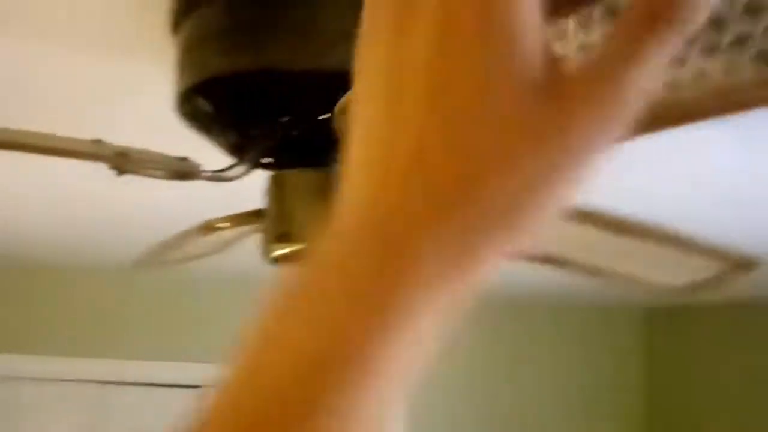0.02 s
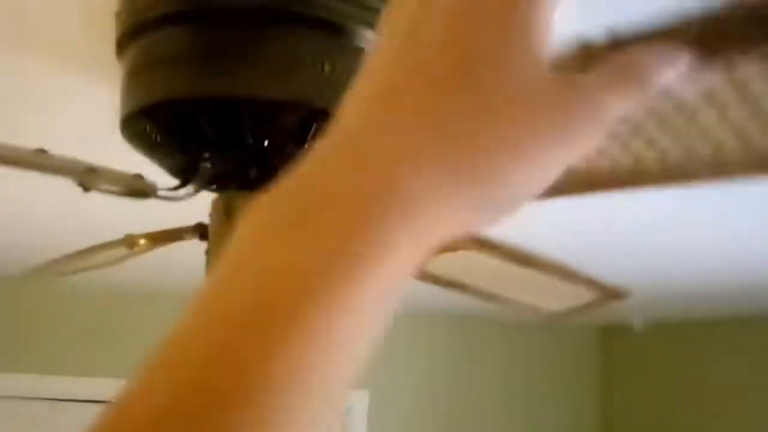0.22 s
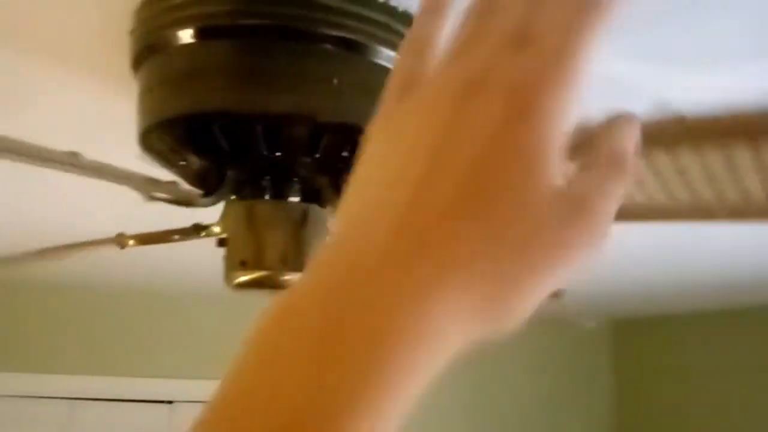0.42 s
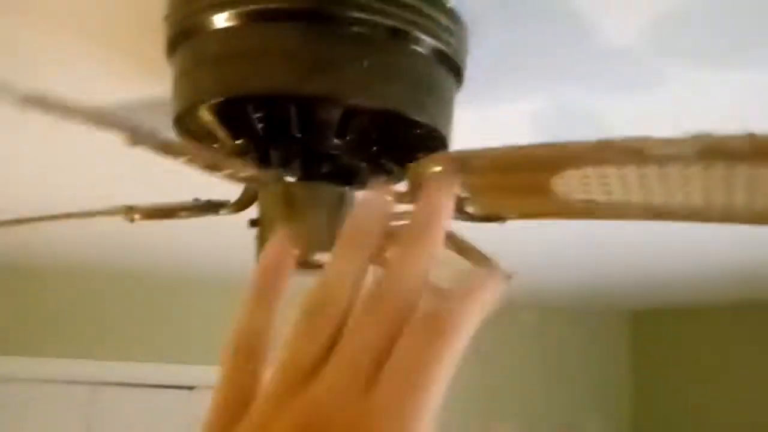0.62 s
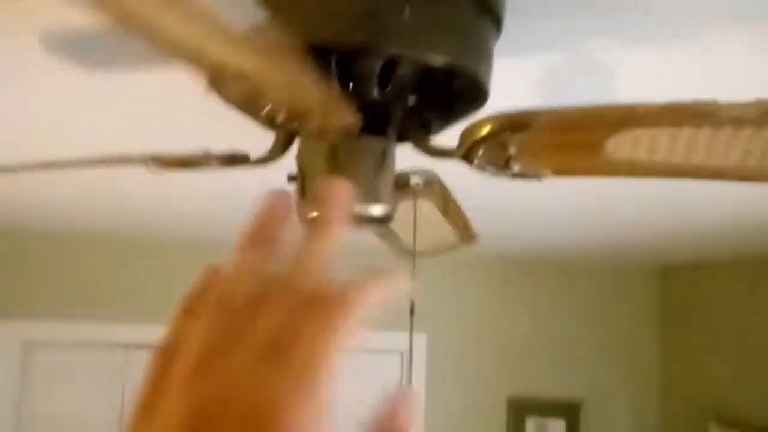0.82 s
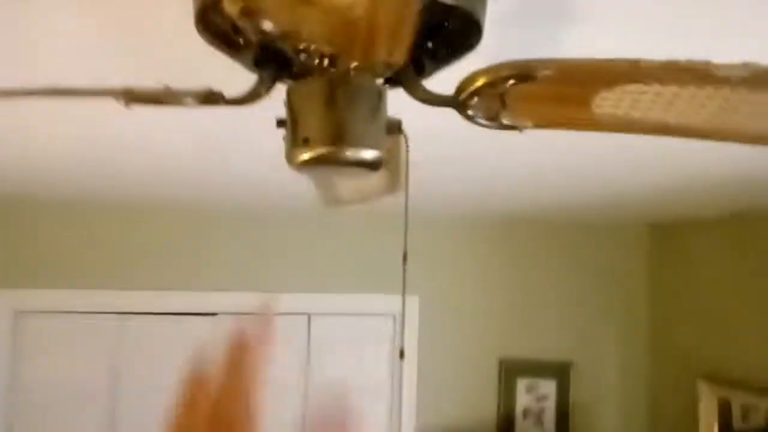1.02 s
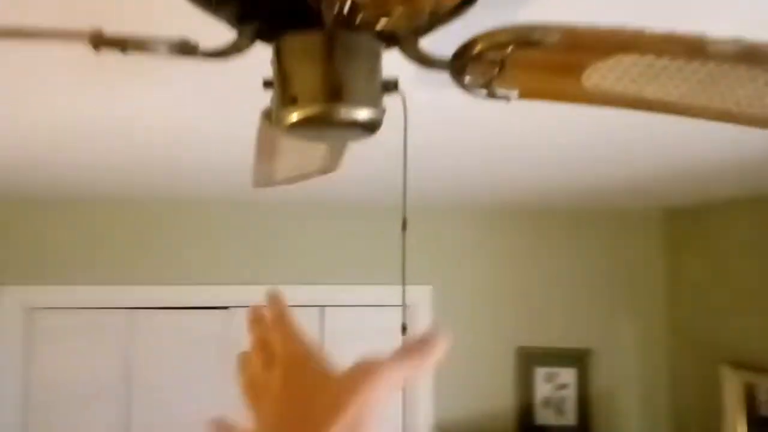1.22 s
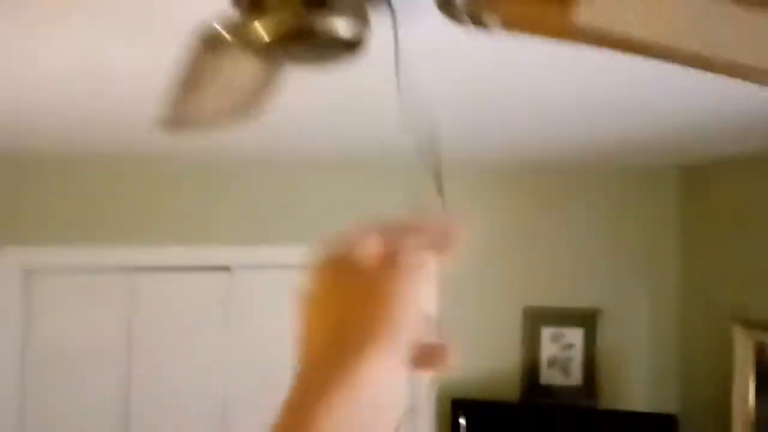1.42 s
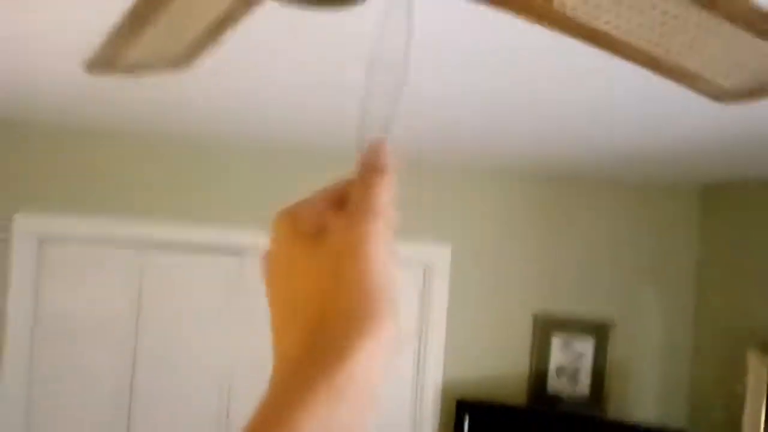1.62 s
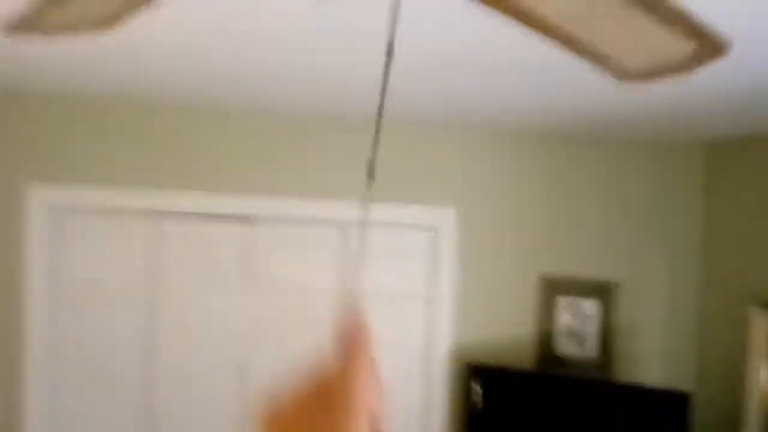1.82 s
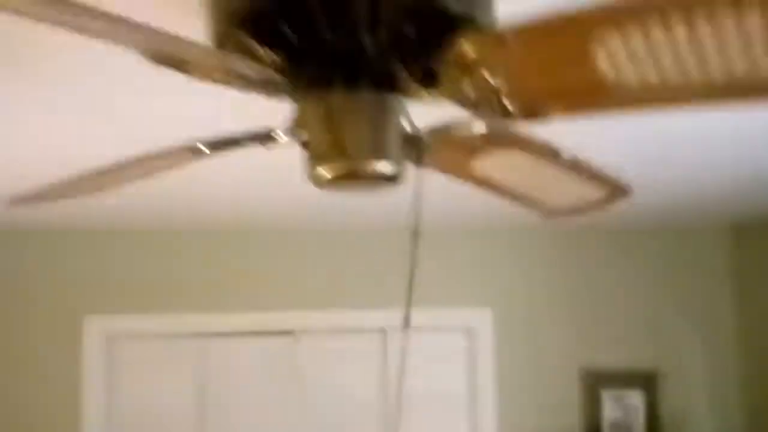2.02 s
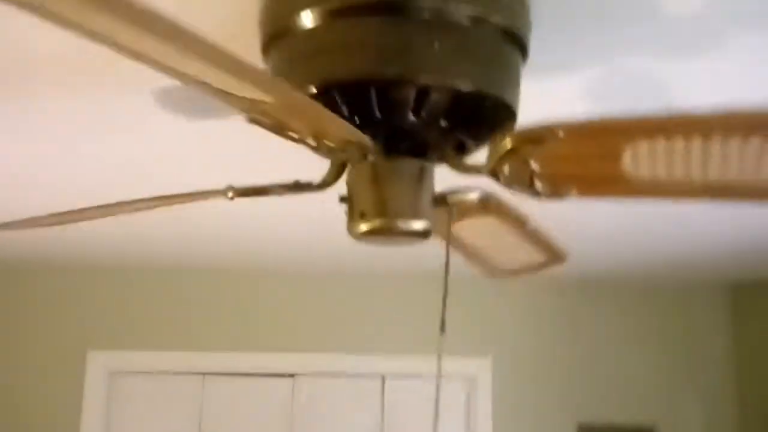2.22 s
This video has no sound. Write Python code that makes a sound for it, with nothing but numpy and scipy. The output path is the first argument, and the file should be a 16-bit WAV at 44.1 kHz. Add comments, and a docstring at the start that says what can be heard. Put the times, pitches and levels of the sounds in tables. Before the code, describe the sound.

Fan blades hitting a hand: a weak knock, a firm slap, then a sharper, woody smack with low shudder. After a near-silent gap, soft rustling and tiny metallic chain clicks, close up in a small room with light hiss.

```python
"""Three slaps of a slowly turning ceiling fan's wooden, cane-inlaid blades against a hand in a quiet bedroom.
Each slap is damped thud and snap pulses plus cane rattle, random clicks shaped by a spectrum.
Thuds ring the blade modes, the fan shudders on its mount, and decaying noise gives a brief room tail.
Then the arm rustles and the pull chain, caught and let go, ticks into small metal modes.
Low house rumble and microphone hiss are filtered noise."""
import sys
import numpy as np
from scipy import signal
from scipy.fft import rfft, irfft
from scipy.io import wavfile
from scipy.ndimage import uniform_filter1d

SR = 44100
rng = np.random.default_rng(int(sys.argv[2]) if len(sys.argv) > 2 else 0)


def transcribe(u):
    """Save the signal u as a 16-bit wav file named by the first command-line argument.

    u: samples, shape (n,) or (channels, n), limited to [-1, 1]; the rate is SR.
    q: integer samples, one column per channel.
    """
    v = np.clip(np.atleast_2d(u).T, -1, 1)
    q = np.round(v * 32767).astype(np.int16)
    wavfile.write(sys.argv[1], SR, q)


N = 101430

# Flesh meets blade. Each row: start in seconds, level in dB, pitch in Hz, blade ring in dB, swell in cycles.
THUDS = [(0.0263, -30, 602, -19.5, 1.1), (0.0328, -41, 387, -13, 1.84), (0.2429, -24.5, 452, -21, 0.85),
         (.2505, -27.5, 740, -13.5, 0.84), (.4160, -47, 513, 2, 0.56), (0.4183, -20, 491, -8, 0.83),
         (0.4284, -18, 786, -8, 0.63), (0.4309, -26, 1380, -19, 1.8), (.4350, -32.5, 256, -4.5, 0.7)]


def amp(db):
    """Converts dB to linear gain."""
    return 10 ** (np.asarray(db) / 20)


def rms_one(x):
    """Scales a signal to rms 1."""
    return x / np.sqrt(np.mean(x ** 2) + 1e-20)


def lowpass(x, top_hz):
    """Sixth-order treble loss above top_hz."""
    return signal.sosfilt(signal.butter(6, top_hz, fs=SR, output="sos"), x)


def at_hz(points, hz):
    """Reads a (Hz, value) curve on a log-frequency axis."""
    points_hz, values = np.array(points).T
    return np.interp(np.log(np.maximum(hz, 1)), np.log(points_hz), values)


def level(rows):
    """Gain along a (seconds, dB) curve."""
    return amp(np.interp(np.arange(N) / SR, *np.transpose(rows)))


def colour(x, spectrum):
    """Shapes a noise by a (Hz, dB) spectrum; rms 1."""
    gain = amp(at_hz(spectrum, np.fft.rfftfreq(N, 1 / SR)))
    return rms_one(irfft(rfft(x) * gain, N))


def ring(x, hz, t60_s):
    """Two-pole resonator: a unit click starts a decaying sine of height 1."""
    radius = amp(-60 / (t60_s * SR))
    angle = 2 * np.pi * hz / SR
    return signal.lfilter([0, np.sin(angle)], [1, -2 * radius * np.cos(angle), radius ** 2], x + 1e-18)


def swells(rows):
    """Sum of envelopes (start s, dB, rise s, t60 s): linear rise, exponential decay."""
    t = np.arange(N) / SR
    total = 0
    for start_s, db, rise_s, t60_s in rows:
        decay = amp(db - 60 * np.maximum(t - start_s - rise_s, 0) / t60_s)
        total = total + decay * np.clip((t - start_s) / rise_s, 0, 1)
    return total


def grains(per_s, spread_db):
    """Random clicks of uneven size and random sign; rms 1."""
    sizes = amp(spread_db * np.minimum(rng.exponential(1, N), 4)) * rng.choice([-1, 1], N)
    return rms_one(sizes * (rng.random(N) < per_s / SR))


def favour(hz, favoured_hz):
    """Change in dB of a mode, falling with its distance from the favoured pitch."""
    db_per_octave = 31.5
    return -db_per_octave * abs(np.log2(hz / favoured_hz))


def add_pulse(out, start_s, db, hz, cycles, grit_db=-90):
    """Adds a heavily damped contact: a gritty sine that peaks after some cycles and dies."""
    turn = np.arange(int(.03 * SR)) * hz / SR
    shape = (turn / cycles) ** 2 * np.exp(2 - 2 * turn / cycles)
    wave = -np.sin(2 * np.pi * turn) + amp(grit_db) * rng.standard_normal(len(turn))
    i = int(start_s * SR)
    out[i:i + len(turn)] += amp(db) * shape * wave


def slaps():
    """Damped thuds and snaps, their top dulled by soft skin, with clicks of the cane rattling."""
    # Fingers and fittings. Each row: start in seconds, level in dB, pitch in Hz.
    snaps = [(.0488, -47, 4300), (.0797, -42, 4000), (.0812, -47, 3800), (.0995, -55, 3500),
             (.2500, -33, 3300), (.2522, -32, 4600), (.2542, -31, 3800), (.2578, -34, 4800),
             (.2627, -23, 4400), (.2725, -35, 4800), (.4209, -25, 2800), (.4230, -22, 4600),
             (.4240, -17, 5100), (.4249, -22, 4600), (.4329, -15, 3400), (.4340, -21, 4300),
             (.4386, -17, 4500), (.5460, -45, 4500)]
    # Cane rattling or brushing the fingers. Each row: start in seconds, level in dB, rise in s, t60 in s.
    rattles = [(.034, -56.5, 0.017, .2), (.195, -62, 0.028, 0.18), (.247, -34.5, 0.0064, .1),
               (.405, -60, 0.015, .05), (.420, -31.5, 0.012, .1)]
    # Rattle spectrum. Each row: frequency in Hz, density in dB per Hz.
    rattle_spectrum = [(530, -10), (900, -7.5), (1180, -20), (1340, -1.5), (1780, -8), (2910, -1),
                       (3230, -3), (4760, 1), (6940, -23), (11000, -39.5), (14300, -67.5), (22000, -120)]
    snap_swell_cycles, snap_grit_db = 1.47, -12.5
    contact_top_hz = 7520
    rattle_per_s, rattle_spread_db = 9000, -1

    contacts = np.zeros(N)
    for start_s, db, hz, _, cycles in THUDS:
        add_pulse(contacts, start_s, db, hz, cycles)
    for start_s, db, hz in snaps:
        add_pulse(contacts, start_s, db, hz, snap_swell_cycles, snap_grit_db)
    contacts = lowpass(contacts + 1e-18, contact_top_hz)
    cane = colour(grains(rattle_per_s, rattle_spread_db), rattle_spectrum)
    return contacts + swells(rattles) * cane


def blade_boom():
    """Every thud rings the blade modes, most strongly those near its pitch."""
    # Blade modes. Each row: frequency in Hz, level in dB, t60 in s.
    blade_modes = [(236, -6.5, 0.32), (296.3, -13, 0.31), (350, -40, 0.087), (413, -9, .24),
                   (449, -13, .24), (541, -11, .18), (661, -13, 0.13), (734, -39, 0.31), (880, -13, 0.077),
                   (1043, -10, 0.35), (1274, -18, 0.19), (1470, -21, 0.12)]
    favour_share = .4

    out = np.zeros(N)
    for hz, mode_db, t60_s in blade_modes:
        clicks = np.zeros(N)
        for start_s, db, thud_hz, ring_db, _ in THUDS:
            click_db = db + ring_db + mode_db + favour_share * favour(hz, thud_hz)
            clicks[int(start_s * SR)] = amp(click_db)
        out += ring(uniform_filter1d(clicks, size=15), hz, t60_s)
    return out


def mount_shudder():
    """The whole fan shudders on its mount: low modes build up, then decay."""
    # Each row: start in seconds, level in dB, rise in s, favoured pitch in Hz, share of the free ring time.
    shudders = [(0.053, -52, 0.018, 140, 0.64), (0.073, -50.5, 0.023, 70, 0.67),
                (.255, -29.5, 0.016, 125.7, 0.37), (0.261, -48.5, .03, 66, .6),
                (0.332, -56, 0.024, 129, 1.01), (.425, -31, 0.02, 115.7, 0.63),
                (0.429, -44, 0.033, 66, 0.71), (.49, -43, 0.051, 124.7, .5), (.58, -52, 0.043, 90, 0.31),
                (1.219, -58.5, 0.021, 120, 0.96), (1.56, -60.5, 0.021, 125, 0.57),
                (1.849, -53.5, 0.047, 122.4, 1.9), (1.951, -50, 0.059, 93.5, 0.15),
                (2.191, -59, 0.042, 110, .8)]
    # Modes of fan and ceiling. Each row: frequency in Hz, level in dB, free t60 in s.
    mount_modes = [(65.7, 2, 0.51), (94.3, 1, 0.83), (119.2, 3.5, 0.34), (136.3, 2.5, 0.22),
                   (163.4, 4.5, 0.25)]

    out, t = np.zeros(N), np.arange(N) / SR
    for start_s, db, rise_s, favoured_hz, share in shudders:
        for hz, mode_db, t60_s in mount_modes:
            mode_level_db = db + mode_db + favour(hz, favoured_hz)
            envelope = swells([(start_s, mode_level_db, rise_s, share * t60_s)])
            out += envelope * np.sin(2 * np.pi * hz * (t - start_s))
    return out


def chain():
    """Beads tick unevenly, dry and into small metal modes."""
    # Chain disturbances. Each row: start in seconds, level in dB, rise in s, t60 in s,
    # favoured pitch in Hz, dry ticks in dB relative to the level.
    moves = [(1.214, -64.5, 0.008, 0.27, 2070, 0.5), (1.429, -73.5, 0.017, 1, 900, -7),
             (1.549, -58, 0.0022, 0.17, 1620, -7), (1.557, -61.5, 0.0044, 0.3, 2310, -11),
             (1.553, -67, .004, 0.42, 3700, 2.5), (1.76, -65, .01, 0.91, 1690, -3.5),
             (1.79, -59, 0.0048, 0.1, 4140, -9), (1.88, -66, 0.034, 0.26, 1320, -19),
             (1.875, -64.5, 0.058, 0.35, 3340, -19), (1.916, -64, .01, 0.069, 4550, -2),
             (1.95, -70.5, 0.026, .4, 9600, -15)]
    # Modes of chain and switch housing. Each row: frequency in Hz, level in dB, t60 in s.
    chain_modes = [(911, 5, 0.075), (1414, -3.5, 0.13), (1566, -4, 0.041), (1960, -11, 0.066),
                   (2110, 0, 0.058), (2953, -2, 0.07), (3130, 1, 0.064), (3940, -5.5, 0.07),
                   (4600, -3.5, .08), (9910, -0.5, 0.13)]
    ticks_per_s, spread_db = 700, 2.5
    dry_top_hz, bead_cycles = 5600, 5.1  # bead_cycles: t60 in periods

    out = np.zeros(N)
    for hz, mode_db, t60_s in chain_modes:
        push = swells([(start_s, db + mode_db + favour(hz, favoured_hz), rise_s, fade_s)
                       for start_s, db, rise_s, fade_s, favoured_hz, _ in moves])
        struck = ring(push * grains(ticks_per_s, spread_db), hz, t60_s)
        out += struck / np.sqrt(t60_s * SR / 14)  # offsets the build-up of long rings
    for start_s, db, rise_s, fade_s, hz, dry_db in moves:
        ticks = np.diff(lowpass(grains(3000, 3.2), dry_top_hz), prepend=0)
        for _ in range(2):
            ticks = ring(ticks, hz, bead_cycles / hz)
        out += swells([(start_s, db + dry_db, rise_s, fade_s)]) * rms_one(ticks)
    return out


def room(x):
    """Diffuse tail: bands of noise, each with its own decay, convolved with the sound."""
    # Reverberation. Each row: frequency in Hz, t60 in s.
    room_t60 = [(100, 0.36), (400, 0.28), (1500, 0.4), (4000, 0.34), (6500, 0.35), (10000, 0.067)]
    tail_db, start_s = -11.5, 0.0033

    t = np.arange(SR // 2) / SR
    edges_hz = 70 * 2 ** np.arange(0, 8.1, .5)
    white = rng.standard_normal((2, len(t)))  # neighbouring bands draw on different noises
    tail = 0
    for k, (low_hz, high_hz) in enumerate(zip(edges_hz, edges_hz[1:])):
        sos = signal.butter(2, [low_hz, high_hz], "band", fs=SR, output="sos")
        t60_s = at_hz(room_t60, np.sqrt(low_hz * high_hz))
        tail = tail + signal.sosfilt(sos, white[k % 2]) * amp(-60 * t / t60_s)
    tail = tail * np.clip(t / start_s - 1, 0, 1)  # silent until start_s, full at twice that
    return amp(tail_db) * signal.fftconvolve(x, tail / np.sqrt(np.sum(tail ** 2)))[:N]


def rustle():
    """Sleeve and hand moving: dense random clicks under a level curve and a spectrum."""
    # Each row: time in seconds, level in dB.
    rustle_level = [(1.0, -105), (1.086, -89), (1.104, -76.5), (1.238, -60), (1.368, -68.5), (1.488, -66),
                    (1.546, -73), (1.564, -66), (1.68, -70.5), (1.684, -77.5), (1.89, -66), (1.994, -78),
                    (2.14, -78), (2.176, -71), (2.296, -82), (2.3, -99)]
    # Each row: frequency in Hz, density in dB per Hz.
    rustle_spectrum = [(120, -14), (200, -6.5), (421, -7.5), (542, -6), (629, -5), (1110, -11.5),
                       (2040, -5.5), (3690, -4.5), (4480, 2.5), (7000, -24.5), (9100, -49), (15400, -120)]
    return level(rustle_level) * colour(grains(6000, 0.83), rustle_spectrum)


def rumble():
    """Low house rumble: noise in a few low room resonances."""
    # Each row: time in seconds, level in dB.
    rumble_level = [(0.0, -73), (0.13, -72), (0.43, -53.5), (0.48, -52), (0.61, -61.5), (0.79, -75),
                    (0.9, -74), (1.24, -74), (1.67, -70.5), (1.91, -61.5), (2.02, -68.5), (2.3, -66)]
    # Resonances. Each row: frequency in Hz, nominal width in Hz, level in dB.
    resonances = [(72, 23, -8), (97, 33, 4), (123, 65, -1), (152, 56, -9)]

    white = rng.standard_normal(N)
    low = np.zeros(N)
    for k, (hz, width_hz, db) in enumerate(resonances):
        low += (-1) ** k * amp(db) * rms_one(ring(white, hz, 1.4 / width_hz))
    return level(rumble_level) * rms_one(low)


def noise_floor():
    """Room tone and microphone hiss: steady noise shaped by a spectrum."""
    # Each row: frequency in Hz, density in dB per Hz.
    floor_spectrum = [(25, -64), (60, -15), (150, -3), (300, -8), (950, -7.5), (2000, -14), (3700, -14.5),
                      (5000, -17), (6300, -28.5), (8000, -23.5), (10000, -16.5), (13000, -19.5),
                      (16000, -20)]
    floor_db = -68.5
    return amp(floor_db) * colour(rng.standard_normal(N), floor_spectrum)


def scene():
    """Slaps and chain excite the room; the other layers are added dry."""
    near = slaps() + chain()
    fan = blade_boom() + mount_shudder()
    return (near + room(near) + fan + rustle() + rumble() + noise_floor())[None]


def record(dry):
    """The microphone loses the deepest bass; the top is cut steeply."""
    mic_low_hz, cutoff_hz = 43.6, 16000
    dry = signal.sosfilt(signal.butter(2, mic_low_hz, "high", fs=SR, output="sos"), dry)
    return signal.sosfilt(signal.cheby2(20, 60, cutoff_hz, fs=SR, output="sos"), dry)


dry = scene()
out = record(dry)
transcribe(out)
```